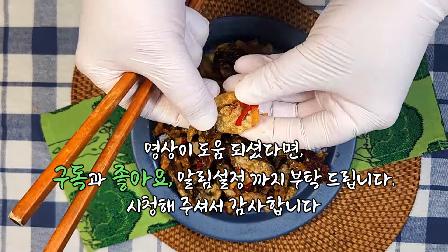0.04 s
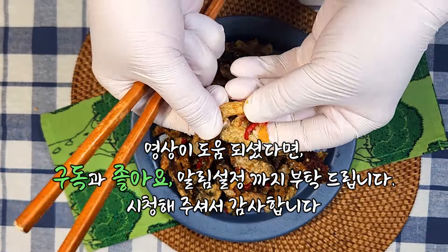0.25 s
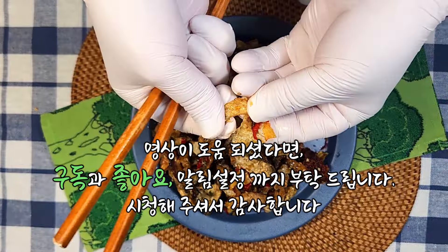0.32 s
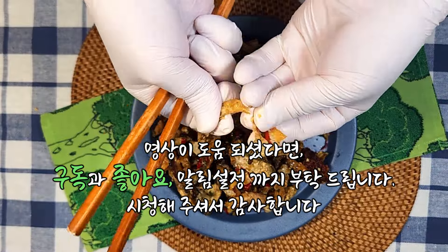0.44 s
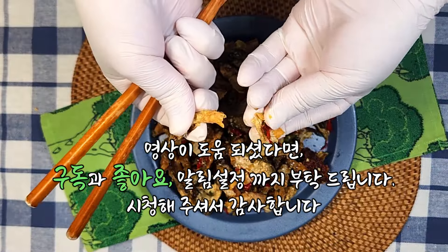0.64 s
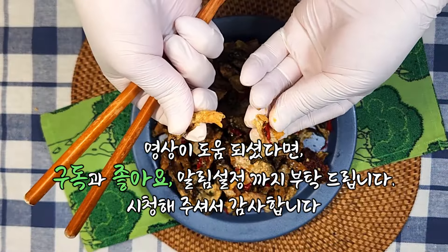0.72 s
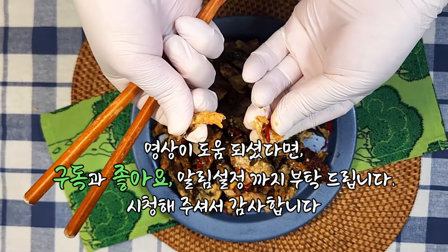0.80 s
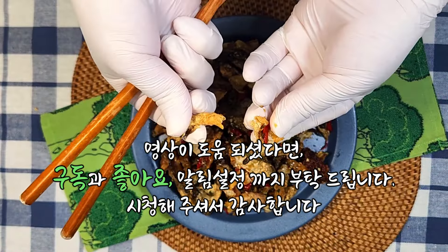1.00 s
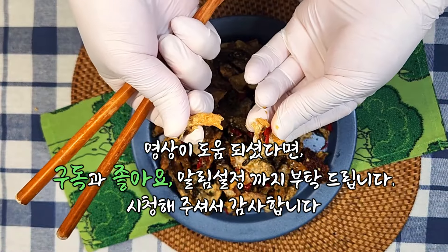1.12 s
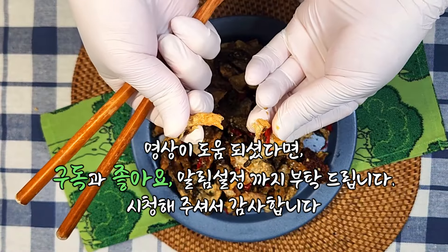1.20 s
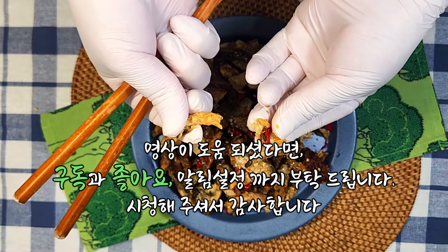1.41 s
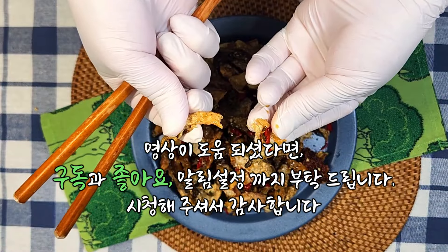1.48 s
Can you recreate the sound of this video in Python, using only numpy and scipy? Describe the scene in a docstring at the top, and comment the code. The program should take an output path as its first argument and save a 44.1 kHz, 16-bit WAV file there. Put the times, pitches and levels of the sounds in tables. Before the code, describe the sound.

A crispy fried piece crunches as gloved fingers break it, ending in a few faint crackles.

```python
"""A crisp fried piece snaps in gloved fingers, close to a wide stereo microphone in a quiet kitchen.
Each crunch is a swarm of tiny fractures that swells and dies in milliseconds; short, pitched knocks
add body as the piece gives way, and a small room smears both. Underneath sits a bed of wavering
appliance hum, rumble, faint whine and room hiss. Near the last crunch the sound drops out briefly."""
import sys
import numpy as np
from scipy import signal
from scipy.fft import rfft, irfft
from scipy.io import wavfile
from scipy.ndimage import uniform_filter1d

SR = 44100
rng = np.random.default_rng(int(sys.argv[2]) if len(sys.argv) > 2 else 0)


def file_out(sig):
    """Save sig as 16-bit WAV at sys.argv[1]."""
    # one column per channel
    cols = np.atleast_2d(sig).T
    # limit, then scale
    lim = np.clip(cols, -1, 1)
    pcm = np.round(lim * 32767).astype(np.int16)
    wavfile.write(sys.argv[1], SR, pcm)


N = 68355

# level rides of the hum (time [s], low tone [dB], middle tone [dB], high tone [dB])
HUM_RIDES = [(0.0, -81, -74.5, -97), (0.172, -71, -72.5, -77.5), (0.188, -68, -73, -108),
             (0.276, -70, -81.5, -76), (0.31, -72.5, -85.5, -118), (0.366, -68, -72, -81.5),
             (0.5, -81, -73, -77.5), (0.626, -103, -76, -90), (0.698, -71, -74.5, -78),
             (0.866, -71.5, -75, -89), (0.974, -66, -73, -79.5), (1.194, -70.5, -75, -83),
             (1.26, -67, -90.5, -89), (1.354, -70, -90, -79.5), (1.398, -68, -106, -83),
             (1.458, -87.5, -75, -81), (1.518, -68.5, -72, -83.5), (1.55, -79.5, -63.5, -96.5)]
# faint held tones in the hum (pitch [Hz], level [dB])
HELD_TONES = [(123, -88.5), (1027, -87.5), (1393, -93)]
# level ride of the whine (time [s], level [dB])
WHINE_RIDE = [(0, -76), (.11, -68.5), (.21, -77.5), (.33, -81.5), (.74, -89.5), (.9, -93.5)]
# EQ curve of the room hiss (frequency [Hz], relative level [dB])
HISS_EQ = [(24, -31.5), (40, -9), (71, -5.5), (195, -9.5), (357, -10), (482, -18), (900, -18.5),
           (1400, -19.5), (2500, -26), (5800, -31), (7000, -38), (11000, -41), (15000, -41.5),
           (16300, -48.5)]
# crunch cues (crest time [s], air level [dB], rise [s], fall [s],
# sizzle re air [dB], bite re air [dB], body re air [dB], left minus right [dB])
CRUNCH_CUES = [(0.034, -87, 0.0033, 0.0058, 13, 11, -27.5, 8),
               (0.106, -91.5, .003, 0.0014, 11.5, 0, -25, 6),
               (0.217, -56, 0.0045, 0.0073, -11, -7, -9, -0.5),
               (0.23, -36.5, 0.002, 0.0017, -4, -11.5, -18.5, 7.5),
               (0.239, -24, 0.0047, 0.0022, -7.5, -8, -23.5, -3),
               (0.255, -37.5, .005, 0.008067, -4.5, 0, -14, -2),
               (0.268, -37.5, .005, .0018, .3, -5.5, -10, 5.5),
               (.307, -30.5, 0.0039, 0.0026, -8, -8.5, -25.5, 2.5),
               (.345, -45.5, .0015, 0.0054, -13, -9, -28, 0), (0.41, -22, .0035, .003, -18, -4.5, -24.5, 1),
               (0.421, -47, 0.0078, 0.0029, -30, 1, -18.5, -13.5),
               (0.433, -45, 0.012, 0.008, -9, 1.17, -12.5, 2),
               (0.479, -28.5, 0.0037, 0.0043, -2, -3.5, -16, 0.5),
               (0.641, -69, 0.0037, 0.0042, -0.2, -13, -38.5, 4.5),
               (.663, -73.5, 0.0026, .004, -3, -6.5, -28, 0),
               (0.687, -62.5, 0.0034, 0.0032, -6, -3, -12, 5.5),
               (0.698, -62.5, .003, 0.00454, -2, -27, -17, 1.5),
               (.872, -78, .004, .004, 4.5, -6.5, -40.5, 3),
               (0.892, -58, 0.000307, 0.0016, -1.5, -31, -39, 6.5),
               (0.9, -73, 0.0049, 0.028, 1.5, -22.5, -13.5, 2.5)]
# resonances of the four crunch layers, brightest first (centre [Hz], width [Hz], relative level [dB])
AIR_BANDS = [(11110, 2900, 8.5), (14660, 7900, 14.5)]
SIZZLE_BANDS = [(9470, 4500, 0.87), (7860, 730, -4.4)]
BITE_BANDS = [(5087, 1800, 0.5), (6300, 3200, 0), (3780, 420, -10.5)]
BODY_BANDS = [(1512, 2600, 4.5), (2376, 470, 6.5), (701, 480, -11)]
# knocks as the piece gives way (time [s], pitch [Hz], level [dB], 60 dB decay [s], left minus right [dB])
KNOCK_CUES = [(.2320, 2230, -50.5, 0.056, -1.6), (.2630, 873, -51.5, 0.036, 3.1),
              (0.2657, 1446, -40.5, 0.035, 0), (.3050, 5600, -44.5, 0.023, 8.5),
              (.3445, 6491, -43, .021, 1.7), (0.41, 2357, -54, .045, 1.6), (0.4113, 520, -61, 0.023, 3.1),
              (.4810, 1032, -54, 0.052, -7.5), (0.484, 345, -60.5, 0.11, 12.5),
              (0.486, 172, -66.5, 0.044, 7), (0.8931, 9110, -40.5, 0.0086, 3.2)]

HUM_HZ, HUM_WAVER_DB, HUM_LAG_RAD = (56.5, 240, 363.2), 0.47, 1.04
RUMBLE_BAND_HZ, RUMBLE_DB = (20, 70), -1
WHINE_HZ, HISS_DB = 1561, -72
FRACTURES_PER_S, SIZE_SPREAD_DB, CENTRE_GAIN = 7900, 5, 0.49
ROOM_T60_S, ROOM_TREBLE_T60_S, ROOM_SPLIT_HZ = 0.17, 0.13, 7400
ROOM_DB, PREDELAY_S = -8, 0.001
KNOCK_ATTACK_S = 0.00084
DROP_START_S, DROP_HOLD_S, DROP_FADE_S, DROP_DB = 0.8825, 0.0085, 0.0015, -30
HIGH_CUT_HZ = 15850


def undb(db):
    return 10 ** (np.asarray(db) / 20)


def unit_rms(x):
    return x / np.sqrt(np.mean(x ** 2))


def pan(side_db):
    return undb([[side_db / 2], [-side_db / 2]])


def drift(rate_hz):
    """Slow random modulation: stepped values, smoothed twice."""
    hold = int(SR / rate_hz)
    steps = np.repeat(rng.standard_normal(N // hold + 1), hold)
    return unit_rms(uniform_filter1d(uniform_filter1d(steps, hold), hold)[:N])


def wavering_tone(t, hz, db):
    """A sine that wavers in level and phase and lags in one microphone; its RMS sits 3 dB above db."""
    phase = 2 * np.pi * (hz * t + rng.random()) + 0.7 * drift(11)
    channels = []
    for offset in (0, HUM_LAG_RAD):
        gain = 2 * undb(db + HUM_WAVER_DB * drift(20.13))
        channels.append(gain * np.sin(phase + offset + 0.22 * drift(8)))
    return np.array(channels)


def appliance_hum(t):
    """Wavering tones over a rumble that comes and goes with the lowest one."""
    times, *levels = np.array(HUM_RIDES).T
    rides_db = [np.interp(t, times, db) for db in levels]
    moving = sum(wavering_tone(t, hz, db) for hz, db in zip(HUM_HZ, rides_db))
    held = sum(wavering_tone(t, hz, db) for hz, db in HELD_TONES)
    sub_band = signal.butter(2, RUMBLE_BAND_HZ, "band", fs=SR)
    rumble = unit_rms(signal.lfilter(*sub_band, rng.standard_normal((2, N))))
    return moving + held + rumble * undb(RUMBLE_DB + rides_db[0])


def whine(t):
    """One thin pitch that swells early, then sinks into the bed."""
    ride_db = np.interp(t, *np.array(WHINE_RIDE).T)
    phase = 2 * np.pi * WHINE_HZ * t + np.array([[0], [1.2]])
    return np.sqrt(2) * undb(ride_db) * np.sin(phase)


def room_hiss():
    """Dark, steady noise, unrelated left and right."""
    bin_hz = np.arange(N // 2 + 1) * SR / N + 1
    eq_hz, eq_db = np.array(HISS_EQ).T
    eq = undb(np.interp(np.log(bin_hz), np.log(eq_hz), eq_db))
    spectrum = rfft(rng.standard_normal((2, N))) * eq
    return undb(HISS_DB) * unit_rms(irfft(spectrum, N))


def fractures():
    """Tiny breaks click at random in unequal sizes: a centre stream plus one for each microphone."""
    chance, polarity = rng.random((2, 3, N))
    sizes = undb(SIZE_SPREAD_DB * rng.standard_normal((3, N)))
    clicks = (chance < FRACTURES_PER_S / SR) * sizes * np.sign(polarity - 0.5)
    return unit_rms(CENTRE_GAIN * clicks[0] + clicks[1:])


def ring(clicks, bands):
    """Clicks ring through steep resonances, scaled so that white noise would keep its level."""
    z = np.exp(-2j * np.pi * np.arange(N // 2 + 1) / N)  # one-sample delay
    response = 0
    for hz, width_hz, db in bands:
        radius = np.exp(-np.pi * width_hz / SR)
        poles = 1 - 2 * radius * np.cos(2 * np.pi * hz / SR) * z + (radius * z) ** 2
        resonance = (1 - radius ** 2) / 2 * (1 - z * z) / poles
        response += undb(db) * resonance ** 2
    return irfft(rfft(clicks) * response / np.sqrt(np.mean(np.abs(response) ** 2)), N)


def crunches(t):
    """Each swarm of fractures swells and fades exponentially, with its own colour and pan."""
    envelopes = np.zeros((4, 2, N))
    for crest, db, rise, fall, *colour_db, side_db in CRUNCH_CUES:
        before = np.exp(np.minimum((crest - t) / rise, 50))
        after = np.exp(np.minimum((t - crest) / fall, 50))
        swell = 2 / (before + after)
        layer_gains = undb(db + np.array([0, *colour_db]))
        envelopes += layer_gains[:, None, None] * pan(side_db) * swell
    treble = fractures()  # air and sizzle share their clicks
    streams = (treble, treble, fractures(), fractures())
    layers = zip(envelopes, streams, (AIR_BANDS, SIZZLE_BANDS, BITE_BANDS, BODY_BANDS))
    return sum(ring(envelope * clicks, bands) for envelope, clicks, bands in layers)


def room_reverb(source, t):
    """Dense echoes make a short tail, unrelated left and right; the treble dies first."""
    noise = rng.standard_normal((2, N)) * (t > PREDELAY_S)
    dull = signal.lfilter(*signal.butter(2, ROOM_SPLIT_HZ, fs=SR), noise)
    tail = dull * undb(-60 * t / ROOM_T60_S) + (noise - dull) * undb(-60 * t / ROOM_TREBLE_T60_S)
    tail /= np.sqrt(np.sum(tail[0] ** 2))
    return undb(ROOM_DB) * signal.fftconvolve(source, tail, axes=1)[:, :N]


def knocks(t):
    """Short damped rings as the piece gives way, a quarter cycle apart between the microphones."""
    out = 0
    for start, hz, db, t60, side_db in KNOCK_CUES:
        age = np.maximum(t - start, 0)
        envelope = (1 - np.exp(-age / KNOCK_ATTACK_S)) * undb(db - 60 * age / t60)
        phase = 2 * np.pi * hz * age + np.array([[0], [np.pi / 2]])
        out += pan(side_db) * envelope * np.sin(phase)
    return out


def scene():
    """Snaps and their reverb up front, the kitchen bed behind."""
    t = np.arange(N) / SR
    snaps = crunches(t) + knocks(t)
    return snaps + room_reverb(snaps, t) + appliance_hum(t) + whine(t) + room_hiss()


def record(dry):
    """The whole mix drops out for an instant and passes through a steep high cut."""
    t = np.arange(N) / SR
    inside_s = np.minimum(t - DROP_START_S, DROP_START_S + DROP_HOLD_S - t)
    dip = np.clip(inside_s / DROP_FADE_S + 1, 0, 1)
    high_cut = signal.ellip(10, 0.2, 70, HIGH_CUT_HZ, fs=SR, output="sos")
    return signal.sosfilt(high_cut, dry * undb(DROP_DB * dip))


dry = scene()
out = record(dry)
file_out(out)
```